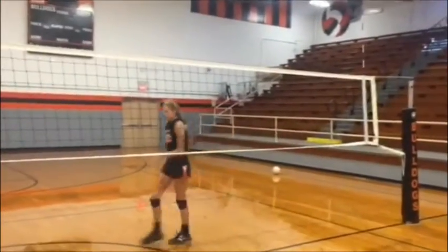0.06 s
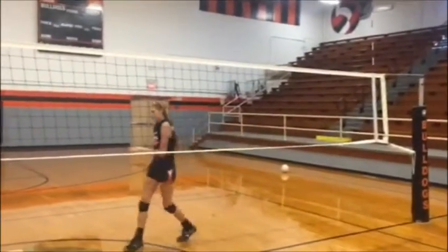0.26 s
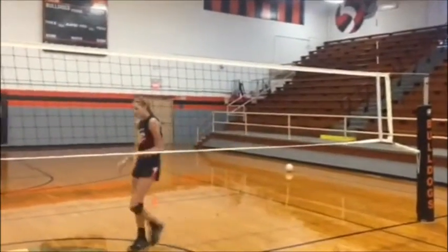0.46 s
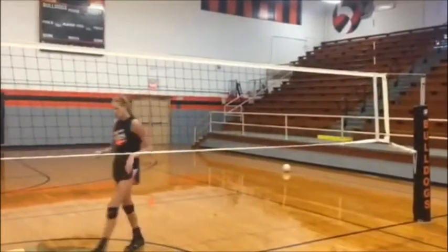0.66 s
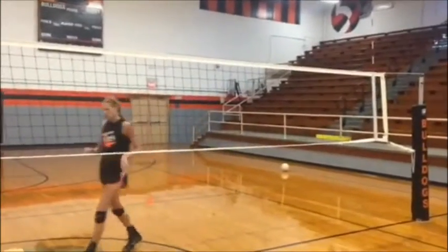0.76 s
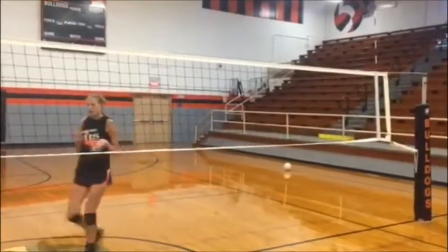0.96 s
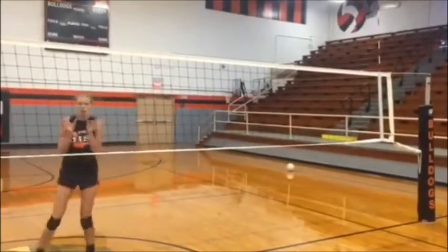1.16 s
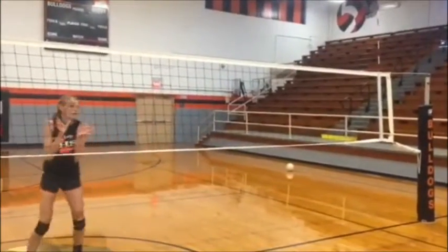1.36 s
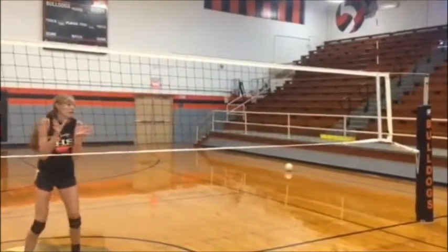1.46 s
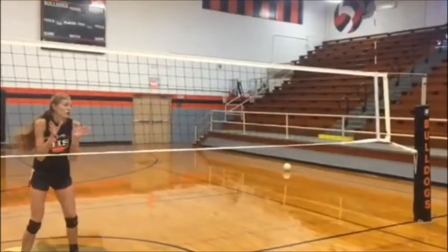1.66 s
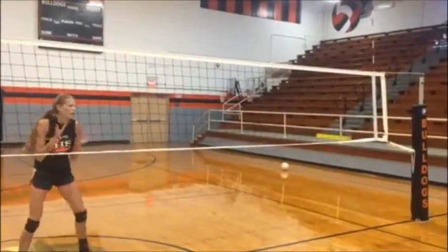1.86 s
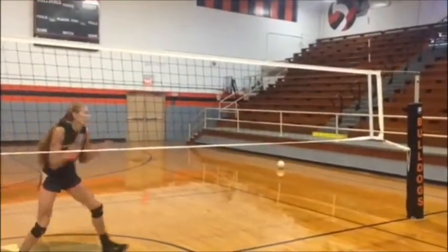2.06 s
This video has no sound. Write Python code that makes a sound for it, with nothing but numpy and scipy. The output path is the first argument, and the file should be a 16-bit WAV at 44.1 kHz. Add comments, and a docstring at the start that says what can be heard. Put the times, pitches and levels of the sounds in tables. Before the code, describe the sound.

A volleyball is smacked once, hard and loud, at the end of a quiet, echoing gymnasium stretch

```python
"""A volleyball is smacked once in a large empty gymnasium: skin crack, shell knock and low thump, then echoes.
Shaped noise and low booms make the hall's reverberation; the echo of an earlier hit dies away from the start.
Ventilation hums and hisses low: shaped noise with three wavering tones.
A player's shoes tick (struck modes), scuff (a band of noise) and thud (low sines) on the sprung wooden floor."""
import sys
import numpy as np
from scipy import signal
from scipy.io import wavfile
from scipy.ndimage import uniform_filter1d

SR = 44100
rng = np.random.default_rng(int(sys.argv[2]) if len(sys.argv) > 2 else 0)


def transcribe(signal):
    """Save signal, clipped to [-1, 1], as a 16-bit WAV file at the path in sys.argv[1]."""
    frames = np.atleast_2d(signal).T
    limited = np.clip(frames, -1, 1)
    pcm = np.round(limited * 32767).astype(np.int16)
    wavfile.write(sys.argv[1], SR, pcm)


N = 92610  # length in samples


def amp(db):
    """Turns decibels into a plain factor."""
    return 10 ** (np.asarray(db) / 20)


def evened(x):
    """Scales a signal to an rms of 1."""
    return x / np.sqrt(np.mean(x ** 2) + 1e-20)


def read(points, hz):
    """Reads a curve between its points, along a logarithmic frequency scale."""
    point_hz, value = np.transpose(points)
    return np.interp(np.log(hz + 1), np.log(point_hz + 1), value)


def add(mix, start_s, sound):
    """Adds a sound into the mix at its start time, cut off at the end of the mix."""
    part = mix[round(start_s * SR):][:len(sound)]
    part += sound[:len(part)]


def dulled(x, top_hz):
    """Takes away treble above top_hz, 12 dB per octave."""
    b, a = signal.butter(2, min(top_hz, 20000), fs=SR)
    return signal.lfilter(b, a, x)


def ring(modes, wave=np.sin):
    """A struck thing vibrates in several modes, each dying at its own pace; peak 1."""
    t = np.arange(SR // 8) / SR
    x = 0
    for hz, db, t60 in modes:
        x = x + amp(db - 60 * t / t60) * wave(2 * np.pi * hz * t)
    return x / abs(x).max()


def swell(t, hz, db, t60, rise_s):
    """A low resonance builds up smoothly, then loses 60 dB every t60 seconds."""
    return amp(db - 60 * t / t60) * (1 - np.exp(-t / rise_s)) * np.sin(2 * np.pi * hz * t)


def resonate(x, hz, width_hz):
    """Keeps a band around hz: shifts hz down to zero, smooths, and shifts back."""
    turn = np.exp(2j * np.pi * hz * np.arange(len(x)) / SR)
    r = np.exp(-np.pi * width_hz / SR)
    smooth = signal.lfilter([1 - r], [1, -r], x / turn)
    return 2 * (turn * smooth).real


def wash(spectrum, since_s=None, patchy_db=1.5, streak_db=0):
    """Noise of a given spectrum, rms 1 before any decay; after since_s each band dies at the hall's pace."""
    # How long the hall takes to lose 60 dB: (frequency [Hz], decay time [s])
    hall_t60 = [(60, 4.9), (200, 2.35), (700, 3.8), (2000, 4.15), (3000, 2.94), (4600, 1.94), (8000, 0.96),
                (12000, 0.67)]
    size, hop = 2048, 512
    frames = N // hop + 5
    hz = np.fft.rfftfreq(size, 1 / SR)

    def to_sound(z):
        return signal.istft(z, nperseg=size, noverlap=size - hop)[1]

    # each is a grid of frequency by time
    real, imag, patches, streaks = rng.standard_normal((frames, len(hz), 4)).T
    patches = uniform_filter1d(uniform_filter1d(patches, size=16, axis=0), size=4, axis=1)
    streaks = uniform_filter1d(streaks, size=16, axis=1)  # narrow in pitch, long in time
    level_db = read(spectrum, hz)[:, None] + patchy_db * evened(patches) + streak_db * evened(streaks)
    z = (real + 1j * imag) * amp(level_db)
    scale = np.sqrt(np.mean(to_sound(z) ** 2))
    if since_s is not None:
        age = np.maximum(np.arange(frames) * hop / SR - since_s, 0)
        z = z * amp(-60 * age / read(hall_t60, hz)[:, None])
    return to_sound(z)[:N] / scale


def ventilation():
    """Air noise, strongest in the bass, with three motor tones that waver in level."""
    # Spectrum of ventilation and microphone hiss: (frequency [Hz], relative level [dB per Hz])
    air = [(30, -15), (50, -10.5), (80, -11.5), (130, -11.5), (250, -13), (560, -26.5), (720, -22.5),
           (1000, -25.5), (1600, -28.5), (2600, -37.5), (4000, -45.5), (6000, -50), (10000, -56),
           (15400, -58)]
    # The motor tones: frequency [Hz] of each
    hum_hz = [53, 107.8, 164.2]
    # How they waver: (time [s], level of first tone [dB], of second [dB], of third [dB])
    hum = [(0.0, -43, -35, -45), (0.068, -53, -44.5, -46), (0.194, -46, -40, -48), (0.354, -75, -49, -59.5),
           (0.464, -55, -47, -51), (0.598, -52.5, -63, -62), (0.672, -47, -47, -55.5),
           (0.92, -56.5, -50, -63), (1.174, -49, -53, -76), (1.322, -50, -43, -58),
           (1.454, -63, -67, -52.5), (1.544, -68, -42, -56), (1.788, -45, -54, -57), (1.9, -51, -41.5, -55)]
    width_hz, steady = 3.7, 0.88  # width of the unsteady part; weight of the steady part, 0 to 1
    t = np.arange(N) / SR
    out = amp(-49) * wash(air, patchy_db=2.58)
    s, *levels = np.transpose(hum)
    for hz, db in zip(hum_hz, levels):
        fuzz = resonate(rng.standard_normal(N), hz, width_hz)
        fuzz = evened(resonate(fuzz, hz, width_hz))
        tone = np.sqrt(2) * np.sin(2 * np.pi * (hz * t + rng.random()))
        out = out + amp(np.interp(t, s, db)) * evened(steady * tone + (1 - steady) * fuzz)
    return out


def shoes():
    """Brief contacts set the sole ringing, rubbing makes a band of noise, and the floor thuds low."""
    # Ticks: (time [s], peak level before the treble cut [dB], treble cut [Hz], spread of the contacts [s])
    ticks = [(0.9186, -32, 3000, 0.0002), (1.3369, -31.5, 16000, 0.000038), (1.447, -48, 13000, 0.000099)]
    # Modes of the sole: (frequency [Hz], relative level [dB], time to lose 60 dB [s])
    sole = [(1080, 5, 0.018), (1420, 3, 0.013), (2080, 4, 0.0086), (2790, 3, 0.0086), (6000, -6, 0.003),
            (13500, -3, 0.0025)]
    # Scuffs: (start [s], length [s], level before the fade in and out [dB])
    scuffs = [(0.892, 0.065, -72), (0.95, 0.099, -73)]
    # Low floor thuds: (time [s], level before rise and decay [dB], frequency [Hz])
    thuds = [(.0, -23, 88.5), (.265, -26, 84.1), (.42, -33.5, 99)]
    scuff_hz, scuff_width_hz = 6150, 4300
    out, t = np.zeros(N), np.arange(SR // 2) / SR
    for s, db, top_hz, spread_s in ticks:
        contacts = rng.random(400) * np.exp(-t[:400] / spread_s)
        tick = np.convolve(ring(sole), contacts)
        add(out, s, amp(db) * dulled(tick / abs(tick).max(), top_hz))
    for s, length_s, db in scuffs:
        rub = resonate(rng.standard_normal(len(t)), scuff_hz, scuff_width_hz)
        rub = evened(resonate(rub, scuff_hz, scuff_width_hz))
        fade = np.sin(np.pi * np.minimum(t / length_s, 1))
        add(out, s, amp(db) * fade * rub)
    for s, db, hz in thuds:
        add(out, s, swell(t, hz, db, t60=0.34, rise_s=0.0048))
    return out


def hall():
    """Many reflections blur into dying noise after the smack and the earlier hit; low resonances boom."""
    # Reverberation of the smack: (frequency [Hz], relative level [dB per Hz])
    smack_hall = [(50, -10), (80, -15), (130, -7.5), (200, -1.5), (290, -8), (500, -17), (810, -18.5),
                  (1160, -9.5), (1500, -14.5), (3500, -12.5), (4800, -19), (7000, -19.5), (9500, -22.5),
                  (10500, -31), (13500, -29.5), (15400, -42)]
    # How it builds up, on top of its decay: (time [s], level [dB])
    hall_build = [(1.929, -68), (1.93, -21), (1.944, -32.5), (1.951, -25), (1.953, -41.5), (1.958, -33),
                  (1.962, -25), (2.017, -27), (2.034, -21.5), (2.06, -24), (2.1, -23.5)]
    # Reverberation of the earlier hit: (frequency [Hz], relative level [dB per Hz])
    earlier_hall = [(50, -20), (85, -3), (110, -5.5), (160, -10), (300, -18), (525, -25.5), (770, -22.5),
                    (1300, -21), (1900, -26.5), (2600, -22), (4200, -31), (5000, -39.5), (8700, -43),
                    (11000, -55), (15400, -66)]
    # Low resonances set going by the smack and its echoes:
    # (time [s], level before rise and decay [dB], frequency [Hz], time to lose 60 dB [s])
    booms = [(1.931, -14.5, 138.6, 0.048), (1.96, -15.5, 135.6, 0.11), (2.028, -17, 112.5, 0.14),
             (2.059, -24.5, 163, 0.35)]
    streak_db = 2  # narrow hall modes that stand out of the reverberation
    t = np.arange(N) / SR
    s, db = np.transpose(hall_build)
    tail = wash(smack_hall, s[0], patchy_db=2.5, streak_db=streak_db)
    out = (t >= s[0]) * amp(np.interp(t, s, db)) * tail
    out += amp(-35) * wash(earlier_hall, 0, streak_db=streak_db)
    for start_s, boom_db, hz, t60 in booms:
        add(out, start_s, swell(t, hz, boom_db, t60, rise_s=0.0123))
    return out


def smack():
    """Each arrival is a double crack of the skin in a noisy slap, a knock of the shell and a low thump."""
    # The smack and its echoes from floor, stands and walls:
    # (time [s], skin crack before the treble cuts [dB], gap to second snap [s], treble cut [Hz],
    #  shell knock [dB], low thump [dB])
    arrivals = [(1.932, 1, .00055, 15500, -11, -16), (1.9344, -12, .0003, 7000, -14.5, -14.5),
                (1.9368, -39, 0.00098, 5000, -13, -45), (1.9405, -20, .0005, 13000, -45, -21.5),
                (1.9434, -9, .0006, 8500, -23, -53), (1.9477, -8, .0003, 6000, -38, -32),
                (1.9511, -13.5, 0.00036, 7500, -31, -34), (1.9592, -23, .0004, 15000, -30, -36),
                (1.9617, -6.5, .0003, 9400, -39, -23), (1.968, -17, .0003, 7000, -28, -31),
                (2.02, -5.5, .00055, 10800, -28, -33), (2.03, -11.5, .0003, 7000, -25, -25)]
    # Modes of the ball's skin: (frequency [Hz], relative level [dB], time to lose 60 dB [s])
    skin = [(1820, 2.5, 0.0027), (3180, 0.5, 0.0033), (4500, -1.5, 0.0036), (5300, -7, 0.0024),
            (7150, 0, 0.004), (12800, -5.5, 0.0023)]
    # Modes of its shell: (frequency [Hz], relative level [dB], time to lose 60 dB [s])
    shell = [(670, -7, 0.015), (1030, 0, 0.022), (1173, 4.5, 0.02), (1430, 0, 0.016), (1870, 1, 0.037),
             (2510, -4, 0.017), (3300, -4, 0.0071)]
    # The low thump: (frequency [Hz], relative level [dB], time to lose 60 dB [s])
    thump = [(276, 8, 0.025)]
    slap_db, slap_t60 = -13, 0.0048  # noise around each crack; seconds to lose 60 dB
    second_snap_db, crack_top_hz = 0.8, 13900
    lead = round(0.0014 * SR)  # the slap swells for this many samples before the crack
    snap, out = ring(skin, np.cos), np.zeros(N)  # a cosine starts abruptly
    t = np.arange(len(snap)) / SR
    rise = np.minimum(t * SR / lead, 1) ** 2
    slap = amp(slap_db - 60 * np.maximum(t - lead / SR, 0) / slap_t60) * rise
    noises = rng.standard_normal((len(arrivals), len(t)))
    for row, noise in zip(arrivals, noises):
        s, crack_db, gap_s, top_hz, knock_db, thump_db = row
        second = amp(second_snap_db) * np.roll(snap, lead + round(gap_s * SR))
        crack = np.roll(snap, lead) + second + slap * noise
        crack = dulled(dulled(crack, top_hz), crack_top_hz)
        add(out, s - lead / SR, amp(crack_db) * crack)
        # minus: the shell first moves inward
        add(out, s, amp(thump_db) * ring(thump) - amp(knock_db) * ring(shell))
    return out


def scene():
    """Adds all layers into one channel."""
    return (ventilation() + shoes() + hall() + smack())[None]


def record(dry):
    """The microphone's bass roll-off, soft overload near full scale, then the band limit of the recorder."""
    low_cut_hz, ceiling, edge_hz = 44, 1.25, 15420  # ceiling: the most the overload lets through
    x = signal.sosfilt(signal.butter(4, low_cut_hz, "high", fs=SR, output="sos"), dry)
    x = ceiling * np.tanh(x / ceiling)
    band_limit = signal.firwin(511, edge_hz, window=("kaiser", 9), fs=SR)
    return signal.oaconvolve(x, band_limit[None], "same")


dry = scene()
out = record(dry)
transcribe(out)
```